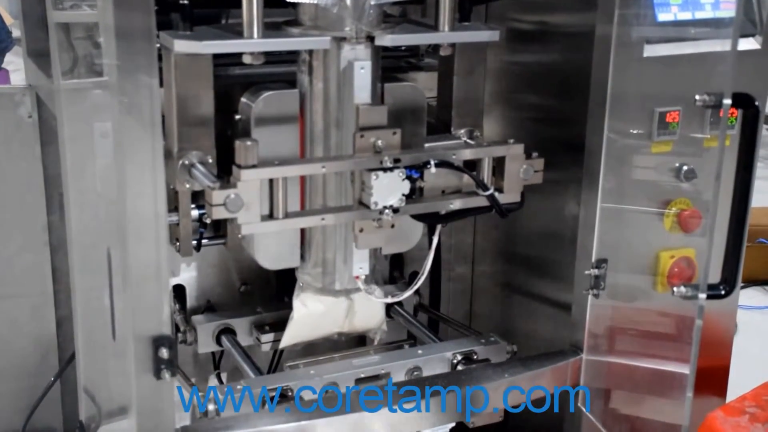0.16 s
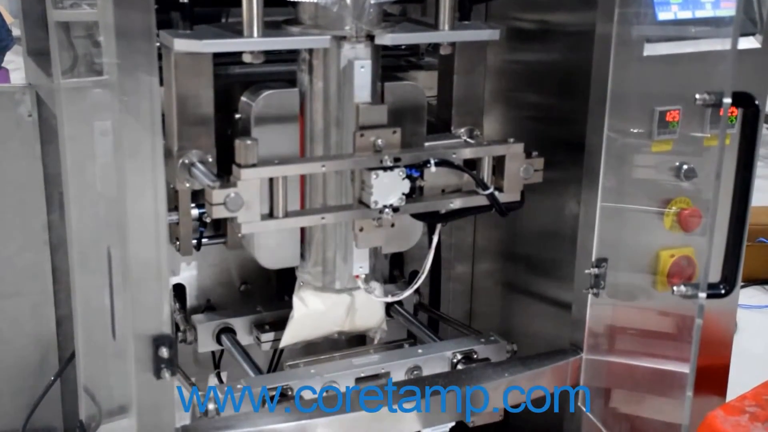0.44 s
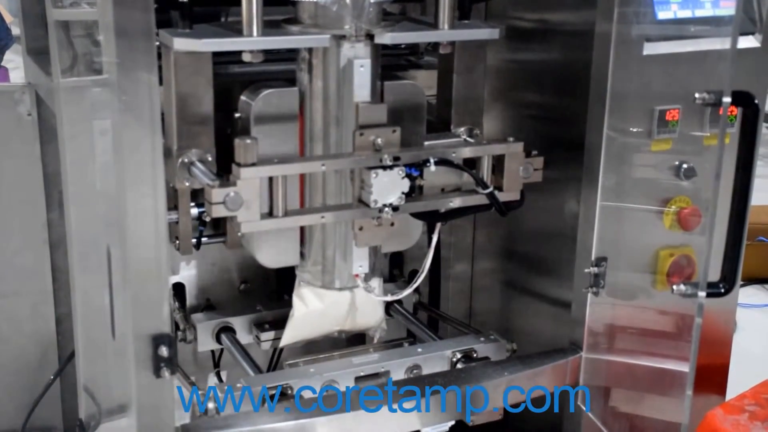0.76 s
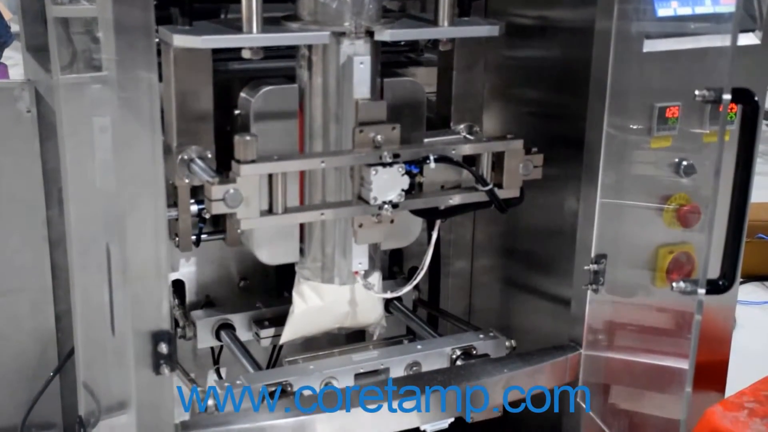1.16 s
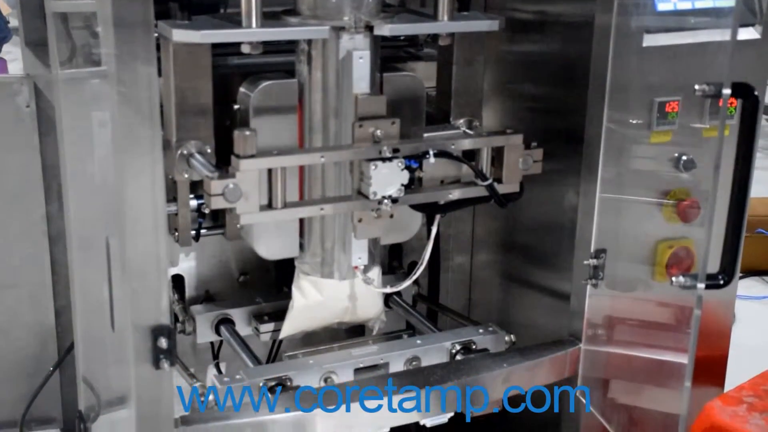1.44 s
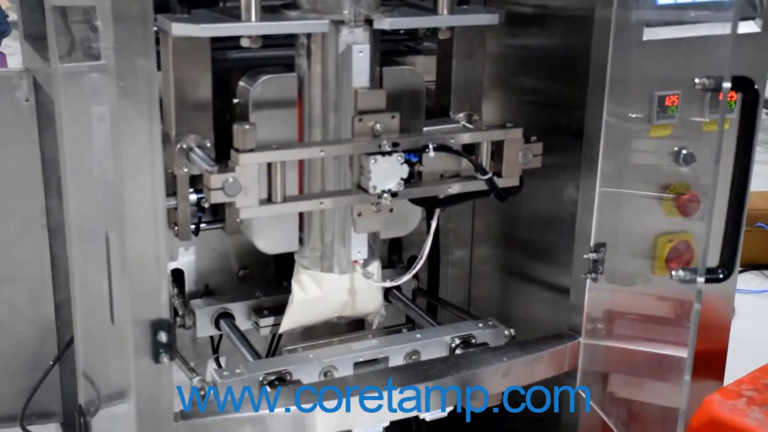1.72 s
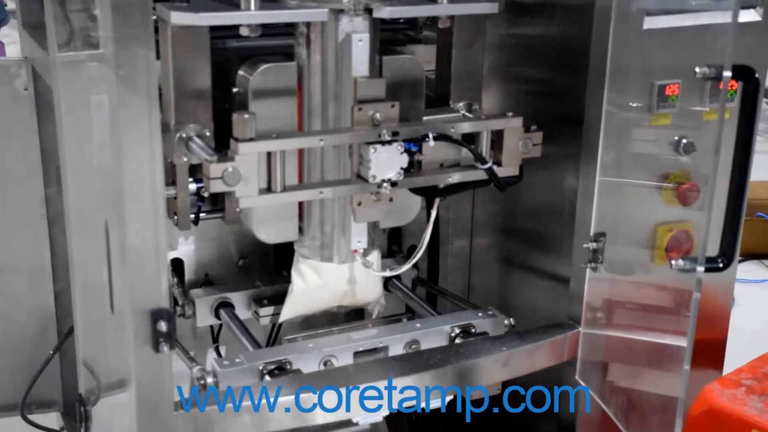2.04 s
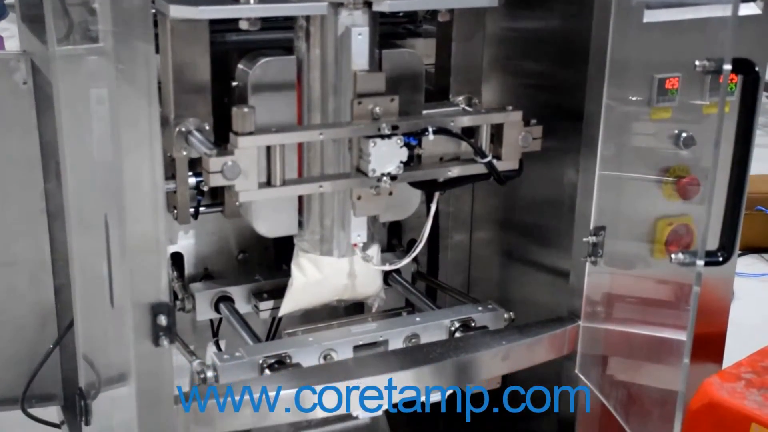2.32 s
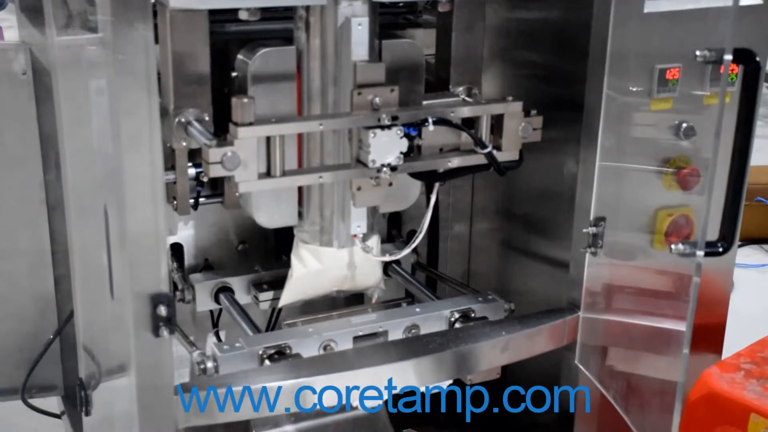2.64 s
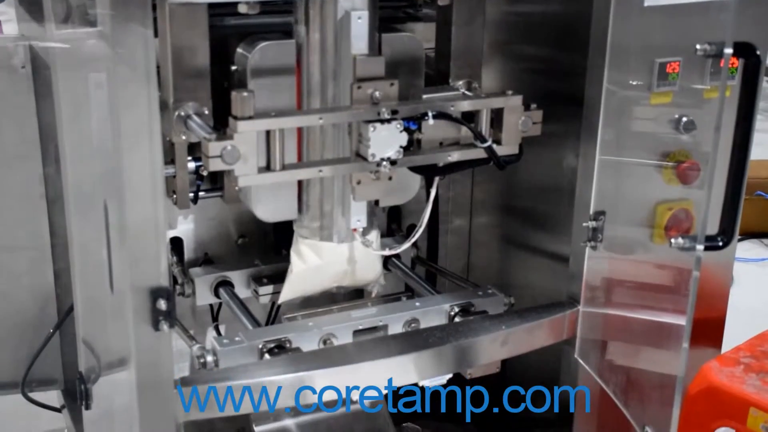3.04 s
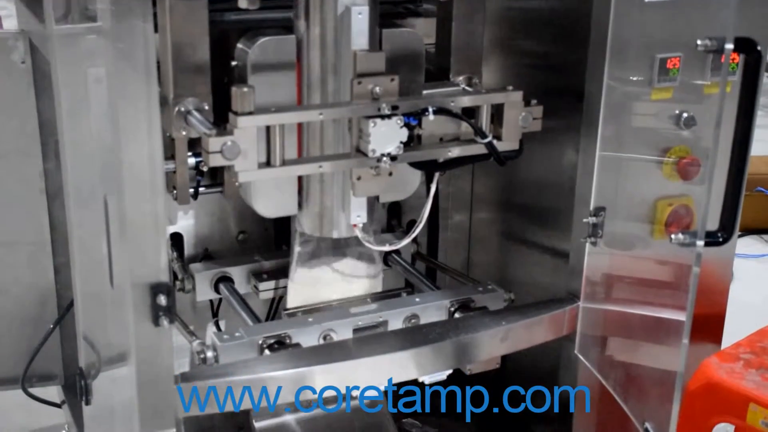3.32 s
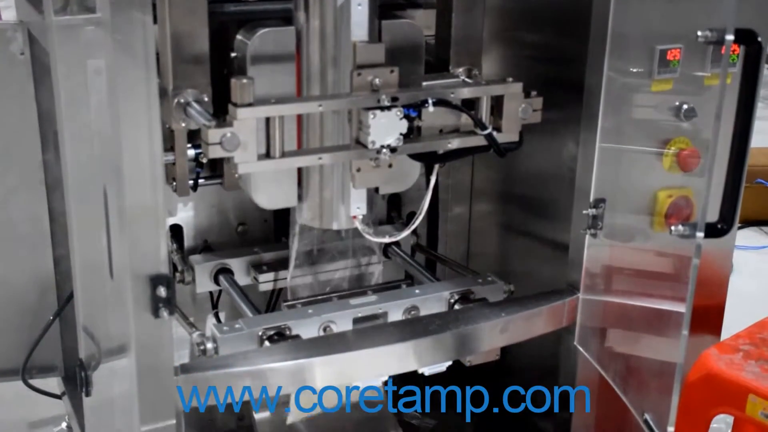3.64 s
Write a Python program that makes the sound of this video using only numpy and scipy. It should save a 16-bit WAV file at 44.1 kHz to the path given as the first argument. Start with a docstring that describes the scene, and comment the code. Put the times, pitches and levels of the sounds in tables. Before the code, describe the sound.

A bag packaging machine chugs, blasts air, clacks its jaws, then hisses and squeals drawing film

```python
"""A bag packaging machine in a hard-walled hall, a small stereo microphone close by; drives whine faintly throughout.
First a filling screw whirs and chugs (coloured noise, double knocks) while an air burst dies away.
The screw stops soon after a second burst, which roars on through the steel frame (two noises, jet and body).
Then the jaw drive swells, and jaws and film click and clack (short rings, noise ticks, a hall tail).
Last, belts draw the film down with rumble, hiss and a roller's squeal (noise and unsteady tones)."""
import sys
import numpy as np
from scipy import signal
from scipy.fft import rfft, irfft, next_fast_len
from scipy.io import wavfile
from scipy.ndimage import uniform_filter1d

SR = 44100
rng = np.random.default_rng(int(sys.argv[2]) if len(sys.argv) > 2 else 0)


def to_wav(sig):
    """Store sig (one row per channel, or 1-D mono) as 16-bit WAV at the path in sys.argv[1].

    Samples outside -1..1 are clipped; the rate is SR.
    """
    pcm = np.clip(np.atleast_2d(sig), -1, 1) * 32767
    pcm = np.round(pcm).astype(np.int16)
    wavfile.write(sys.argv[1], SR, pcm.T)  # frames by channels


N = 166257
T = np.arange(N) / SR  # time of each sample in seconds

# In every COLOUR table, each row: frequency in Hz, relative level in dB per Hz.
# In every RESONANCES table, each row: centre in Hz, width in Hz, lift in dB.

# The hall's hum.
HALL_COLOUR = [(40, -24.5), (130, -22.5), (300, -6.5), (750, -7.5), (1800, -11), (3900, -30),
               (10000, -63.5), (15000, -75)]
HALL_DB = -29.5
# Faint whine of the drive electronics. Each row: frequency in Hz, level in dB.
IDLE_WHINE = [(4861, -52.5), (5136, -61), (10024, -63)]

# Filling screw and the tube around it.
SCREW_COLOUR = [(60, -75), (180, -13.5), (330, -11), (800, -5), (3000, -19), (4500, -36.5), (9300, -30.5),
                (15000, -61)]
TUBE_RESONANCES = [(1042, 11, 12), (1260, 31, 9), (793, 55, 9)]
SCREW_DB, SCREW_STOP_S, SCREW_FALL_S = -24, 1.27, 0.012
# Whine of the turning screw. Each row: centre in Hz, width in Hz, level in dB.
SCREW_WHINE = [(454.5, 18, -33.5), (4900, 270, -44.5), (9090, 120, -48.5), (14540, 250, -50)]
# Chugs of the screw. Each row: midpoint in seconds, level in dB.
CHUGS = [(0.016, -15), (0.184, -16), (0.331, -15), (0.48, -16.5), (.632, -15), (0.783, -16.5), (.94, -16.5),
         (1.087, -19)]
CHUG_GAP_S, CHUG_HALF_LENGTH_S = 0.018, 0.009  # each chug knocks twice
# Ring of a chug. Each row: frequency in Hz, level under the chug in dB.
CHUG_RING = [(830, -3.5)]
# Rattle of a chug.
RATTLE_COLOUR = [(200, -35), (850, 3), (2200, -5.5), (4000, -23), (9000, -36.5)]
RATTLE_DB = -4  # relative to the chug

# Fine film rustle. Each row: time in seconds, level in dB.
RUSTLE = [(0, -35.5), (.21, -40), (.26, -59), (1.13, -46), (1.15, -36.5), (1.57, -41), (1.72, -53),
          (2.3, -48.5), (2.42, -49), (3.15, -48)]
RUSTLE_COLOUR = [(3000, -8), (6500, -5), (11000, -11), (15000, -42)]

# Belts that draw the film down.
BELT_COLOUR = [(40, -45), (75, -11), (130, -8), (440, -12), (1330, -7.5), (2500, -14.5), (5000, -30)]
BELT_DB, BELT_START_S, BELT_RISE_S = -30, 3.15, 0.1
# Whine of the belts. Each row: frequency in Hz, level in dB.
BELT_TONE = [(8549, -46)]
# Film sliding past. Each row: time in seconds, level in dB.
SLIDE = [(3.145, -48), (3.16, -28), (3.3, -31.5), (3.77, -33.5)]
SLIDE_COLOUR = [(1000, -1.5), (2000, -7), (3500, -4), (6000, -9.5), (9000, -4.5), (12000, -18),
                (15500, -13)]
# Roller squeal. Each row: time in seconds, level in dB.
SQUEAL = [(3.31, -58), (3.335, -20), (3.42, -28), (3.445, -24.5), (3.6, -36), (3.77, -42)]
# Rough part of the squeal. Each row: centre in Hz, width in Hz, level relative to the squeal in dB.
SQUEAL_TONES = [(1354, 90, -6)]
# Steady part of the squeal. Each row: frequency in Hz, level relative to the squeal in dB.
SQUEAL_CORE = [(1318, -6)]

# Jaw drive. Each row: time in seconds, rumble level in dB, drone level in dB.
JAW_DRIVE = [(2.37, -40, -56), (2.42, -23, -38), (2.51, -23.5, -34.5), (2.62, -24, -32.5), (2.85, -33, -32),
             (3.1, -34.5, -50)]
JAW_COLOUR = [(150, -36), (300, -4.5), (600, 2.5), (1500, -9), (3500, -11), (8000, -35)]
JAW_RESONANCES = [(574, 85, 9.5), (1510, 590, 11.5)]
# Drone of the jaw drive. Each row: centre in Hz, width in Hz, level relative to the drone's course in dB.
JAW_DRONE = [(325, 33, -0.5)]

# Clacks. Each row: start in seconds, level in dB, ring frequency in Hz, snap level over that in dB.
CLACKS = [(0.187, -5.5, 1580, -10), (1.153, -6, 1500, -8.5), (2.3234, -12, 2250, -33),
          (2.3491, -10, 1650, -34), (2.4063, -12, 1800, -1), (2.4408, -17, 3750, -28),
          (2.517, -9, 1670, -10), (2.6138, -14, 920, -16), (2.6728, -6, 1300, -28),
          (2.726, -15.5, 2340, -11), (2.8658, -19, 4600, 0.5), (2.959, -20, 1980, -20.5),
          (2.984, -21.5, 2490, -24), (3.056, -13.5, 2800, -10), (3.116, -11, 2700, -18),
          (3.155, -12, 1700, -19), (3.163, -8.5, 1570, -21), (3.442, -11.5, 3200, -9)]
CLACK_CYCLES, CLACK_RISE_S = 9, 0.0002  # the ring falls 60 dB in this many cycles
THUD_DB, THUD_Q, THUD_T60_S = -6, 0.9, 0.01  # noise an octave above the ring, relative to the clack
SNAP_HZ, SNAP_Q, SNAP_T60_S = 7300, 0.6, 0.002
# Crackling film creases. Each row: start in seconds, peak level in dB.
CRACKLES = [(0.12, -23), (1.273, -20), (1.4441, -22.5), (1.4735, -23), (1.494, -25), (1.548, -20),
            (1.5593, -16.5), (1.5697, -19), (1.609, -22.5), (1.6744, -25.5), (2.3666, -23), (2.4725, -27),
            (2.5412, -26), (2.619, -26), (2.658, -33)]
CRACKLE_HZ, CRACKLE_Q, CRACKLE_T60_S = 7300, 0.68, 0.0078
PANEL_DELAY_S, PANEL_DB = 0.0046, -4  # a nearby panel returns each snap and crackle
TAIL_T60_S, TAIL_DB = 0.19, -5  # the hall's answer to the clicks

# Air bursts, one list of rows for each. Each row: time in seconds, body level in dB, jet level in dB.
AIR_BURSTS = [
    [(0, -19.5, -23.5), (.2, -23.5, -28.5), (.5, -31.5, -36.5)],
    [(1.137, -45, -46), (1.143, -20, -18), (1.22, -15, -21), (1.4, -16, -23.5), (1.7, -21.5, -30.5),
     (2.3, -36, -46)],
]
BODY_COLOUR = [(100, -39), (200, -11.5), (312, 1.5), (780, -10), (1150, -9.5), (3000, -17), (6000, -49)]
FRAME_RESONANCES = [(194.6, 22, 8.5), (314, 33, 5.5), (844, 360, 13)]
JET_COLOUR = [(710, -70), (1200, 1.5), (1740, 3.5), (5270, -13.5), (9130, -48), (15000, -66)]

# Stereo spread. Each row: frequency in Hz, gain of the unshared part in dB.
SPREAD = [(40, -10), (130, -18.5), (300, -35.5), (1000, -22.5), (6000, -8.5), (14000, -4)]
# Stereo balance. Each row: frequency in Hz, left over right in dB.
BALANCE = [(600, 0), (2500, -2), (13000, 0)]
# Microphone response. Each row: frequency in Hz, gain in dB.
MICROPHONE = [(45, -19.5), (110, -2), (12500, -0.5), (15600, -21)]
TOP_HZ = 15655


def amp(db):
    """Amplitude factor for a level in dB."""
    return 10 ** (np.asarray(db) / 20)


def unit(x):
    """x brought to rms 1."""
    return x / np.sqrt(np.mean(x ** 2) + 1e-20)


def along(points, hz):
    """Read (Hz, value) points on a log frequency axis."""
    f, v = np.transpose(points)
    return np.interp(np.log(hz + 1), np.log(f + 1), v)


def gains(rows):
    """One gain per sample for each dB column, silent outside the rows."""
    s, *columns = np.transpose(rows)
    return np.array([amp(np.interp(T, s, c, left=-120, right=-120)) for c in columns])


def ramp(s, width_s):
    """Smooth step from 0 to 1 centred on s."""
    return .5 + .5 * np.tanh((T - s) / width_s)


def filtered(x, response):
    """x shaped by a response that is a function of frequency."""
    m = next_fast_len(N + SR // 2)
    return irfft(rfft(x, m) * response(np.fft.rfftfreq(m, 1 / SR)), m)[..., :N]


def bell(f, centre, width):
    """Resonance curve, 1 at the centre and a half at the edges of the width."""
    return 1 / (1 + (2 * (f - centre) / width) ** 2)


def rush(colour, resonances=(), patchy_db=1.43, grain_db=1.5):
    """Two unrelated noises, jointly rms 1: coloured, patchy, grainy, lifted at resonances."""
    grain = unit(uniform_filter1d(rng.standard_normal(N), size=60))
    raw = rng.standard_normal((2, N)) * amp(grain_db * grain)
    z = signal.stft(raw, nperseg=512)[2]
    # patches over neighbouring frequencies and moments
    patches = uniform_filter1d(rng.standard_normal(z.shape[1:]), size=6, axis=0)
    patches = unit(uniform_filter1d(patches, size=8, axis=1))
    pair = signal.istft(z * amp(patchy_db * patches), nperseg=512)[1][:, :N]

    def response(f):
        lift = sum(db * bell(f, c, w) for c, w, db in resonances)
        return amp(along(colour, f) + lift)
    return unit(filtered(pair, response))


def whine(lines):
    """Unsteady tones: narrow bands of noise."""
    total = np.zeros((2, N))
    for centre, width, db in lines:
        noise = rng.standard_normal((2, N))
        total += amp(db) * unit(filtered(noise, lambda f: bell(f, centre, width)))
    return total


def slow_drift():
    """Slow random wander of rms 1."""
    return unit(uniform_filter1d(rng.standard_normal(N), size=900))


def hum(lines, waver_db):
    """Tones whose level and phase waver a little."""
    total = np.zeros((2, N))
    for hz, db in lines:
        level = amp(db + waver_db * slow_drift())
        phase = 2 * np.pi * hz * T + 0.46 * slow_drift() + [[0], [1]]
        total += level * np.sqrt(2) * np.sin(phase)
    return total


def tick(s, db, hz, q, t60):
    """A dying noise burst passed twice through a broad resonance, starting at s and peaking at db."""
    t = np.arange(SR // 20) / SR
    burst = rng.standard_normal(len(t)) * (1 - np.exp(-t / .0004)) * amp(-60 * t / t60)
    for _ in range(2):
        burst = signal.lfilter(*signal.iirpeak(hz, q, SR), burst)
    burst = amp(db) * burst / np.abs(burst).max()
    return np.pad(burst, (round(s * SR), N))[:N]


def hall():
    """Far background: the hall's hum as low noise, the drive electronics as faint tones."""
    return amp(HALL_DB) * rush(HALL_COLOUR) + hum(IDLE_WHINE, waver_db=3.5)


def rustle():
    """Fine film rustle: bright noise that follows a level course."""
    return gains(RUSTLE) * rush(RUSTLE_COLOUR)


def belts():
    """Belts draw the film down: rumble and whine, sliding hiss, a squealing roller."""
    drive = amp(BELT_DB) * rush(BELT_COLOUR) + hum(BELT_TONE, waver_db=2)
    slide = gains(SLIDE) * rush(SLIDE_COLOUR, patchy_db=2.0)
    squeal = gains(SQUEAL) * (whine(SQUEAL_TONES) + hum(SQUEAL_CORE, waver_db=0.5))
    return ramp(BELT_START_S, BELT_RISE_S) * drive + slide + squeal


def jaw_drive():
    """The jaw drive swells: resonant rumble and a narrow drone."""
    rumble, drone = gains(JAW_DRIVE)
    return rumble * rush(JAW_COLOUR, JAW_RESONANCES) + drone * whine(JAW_DRONE)


def screw():
    """The screw whirs in its tube and chugs once a turn, each chug a pair of ringing, rattling knocks."""
    whir = amp(SCREW_DB) * rush(SCREW_COLOUR, TUBE_RESONANCES) + whine(SCREW_WHINE)
    running = 1 - ramp(SCREW_STOP_S, SCREW_FALL_S)
    chug = np.zeros(N)
    for s, db in CHUGS:
        for side in (-.5, .5):
            chug += amp(db) * np.exp(-((T - s - side * CHUG_GAP_S) / CHUG_HALF_LENGTH_S) ** 2)
    knock = hum(CHUG_RING, waver_db=2) + amp(RATTLE_DB) * rush(RATTLE_COLOUR, grain_db=2.5)
    return running * whir + chug * knock


def hall_tail(dry):
    """The hall's answer: two unrelated noise tails dying exponentially."""
    _, t, z = signal.stft(rng.standard_normal((2, SR // 2)), SR, nperseg=256)
    tail = signal.istft(z * amp(-60 * t / TAIL_T60_S), SR, nperseg=256)[1]
    return signal.fftconvolve(dry[None], tail / np.linalg.norm(tail[0]), axes=1)[:, :N]


def clicks():
    """Jaws clack with a short ring, thud and snap; film creases crackle; a panel and the hall answer."""
    dull, bright = np.zeros(N), np.zeros(N)
    for s, db, hz, snap_db in CLACKS:
        t = np.clip(T - s, 0, 1)
        decay = amp(db - 60 * t * hz / CLACK_CYCLES)
        dull -= 2 * decay * (1 - np.exp(-t / CLACK_RISE_S)) * np.sin(2 * np.pi * hz * t)
        dull += tick(s, db + THUD_DB, 2 * hz, THUD_Q, THUD_T60_S)
        bright += tick(s, db + snap_db, SNAP_HZ, SNAP_Q, SNAP_T60_S)
    for s, db in CRACKLES:
        bright += tick(s, db, CRACKLE_HZ, CRACKLE_Q, CRACKLE_T60_S)
    panel = amp(PANEL_DB) * np.roll(bright, round(PANEL_DELAY_S * SR))
    dry = dull + bright + panel
    # a negative unshared part sets the clicks right of centre
    return dry * [[1], [-.4]] + amp(TAIL_DB) * hall_tail(dry)


def air_bursts():
    """Cylinders vent: a bright air jet, and a long roar that rings in the steel frame."""
    body, jet = sum(gains(rows) for rows in AIR_BURSTS)
    return body * rush(BODY_COLOUR, FRAME_RESONANCES) + jet * rush(JET_COLOUR)


def scene():
    """Each source gives a shared and an unshared part; their sum and difference reach the two ports."""
    shared, apart = hall() + rustle() + belts() + jaw_drive() + screw() + clicks() + air_bursts()
    apart = filtered(apart, lambda f: amp(along(SPREAD, f)))
    ports = np.array([shared + apart, shared - apart])
    # half of the balance lifts the left, half lowers the right
    return filtered(ports, lambda f: amp(np.outer([.5, -.5], along(BALANCE, f))))


def record(dry):
    """The microphone's colour; nothing passes above the band limit."""
    return filtered(dry, lambda f: amp(along(MICROPHONE, f)) * (f < TOP_HZ))


dry = scene()
out = record(dry)
to_wav(out)
```